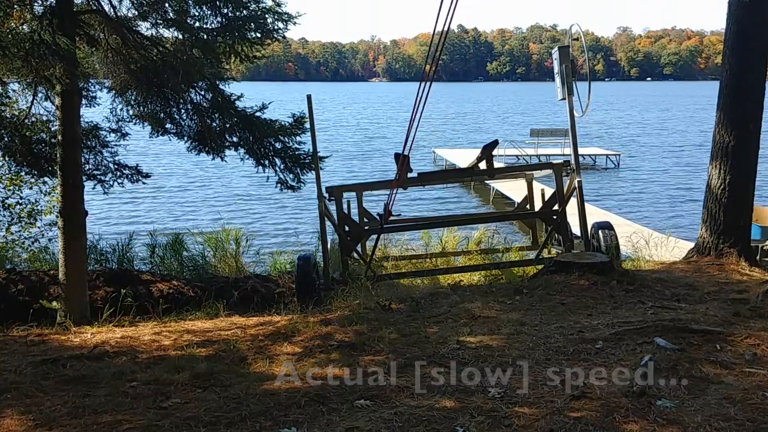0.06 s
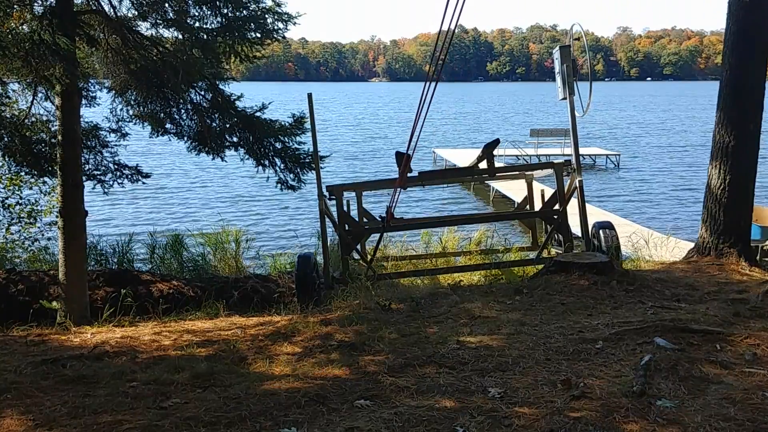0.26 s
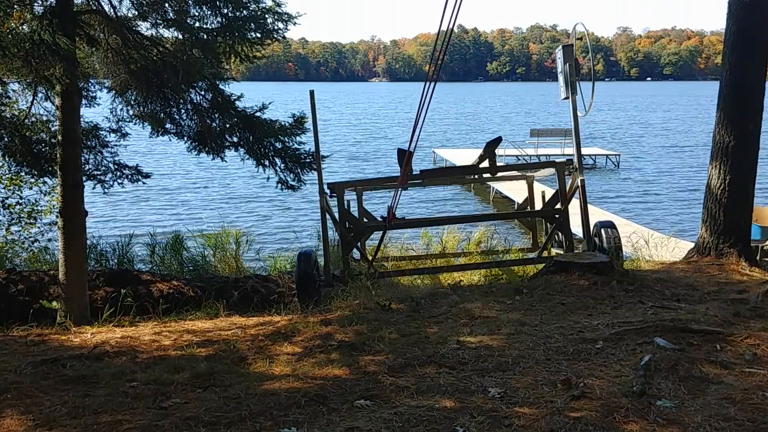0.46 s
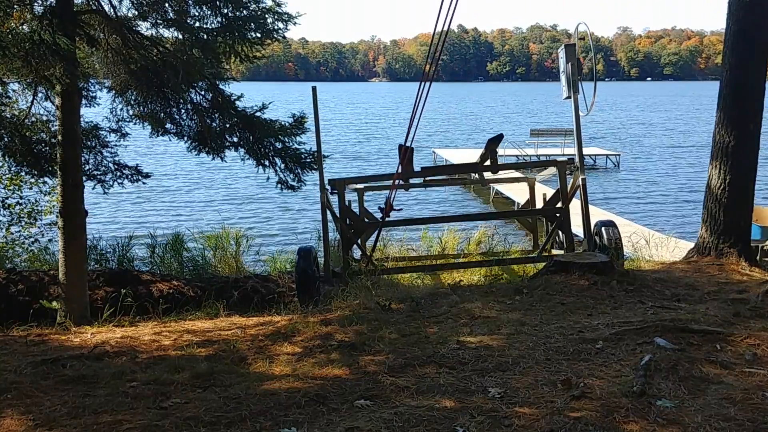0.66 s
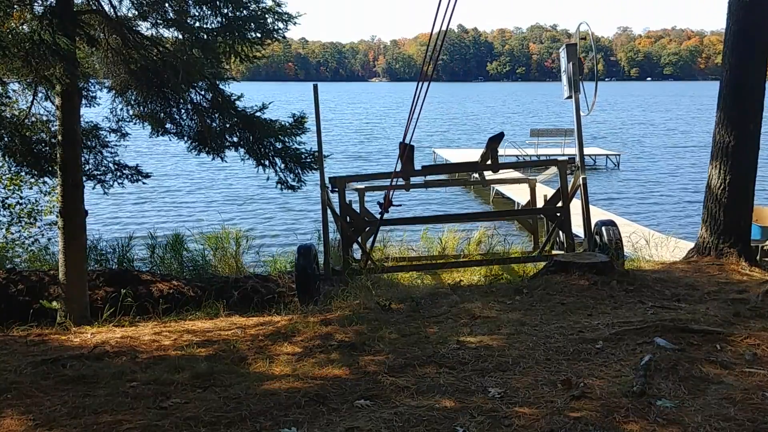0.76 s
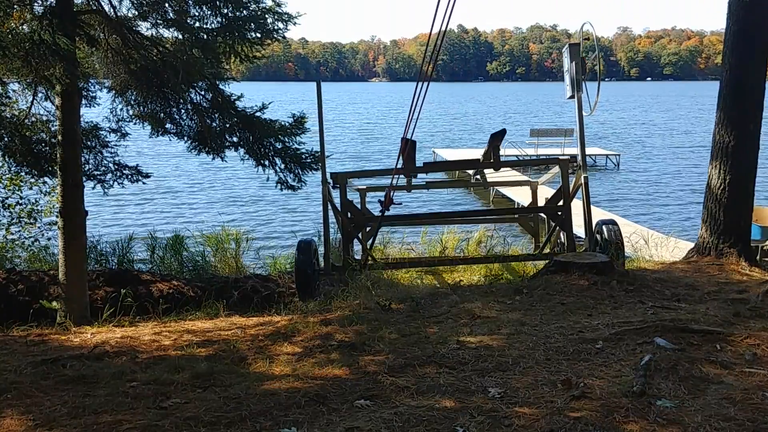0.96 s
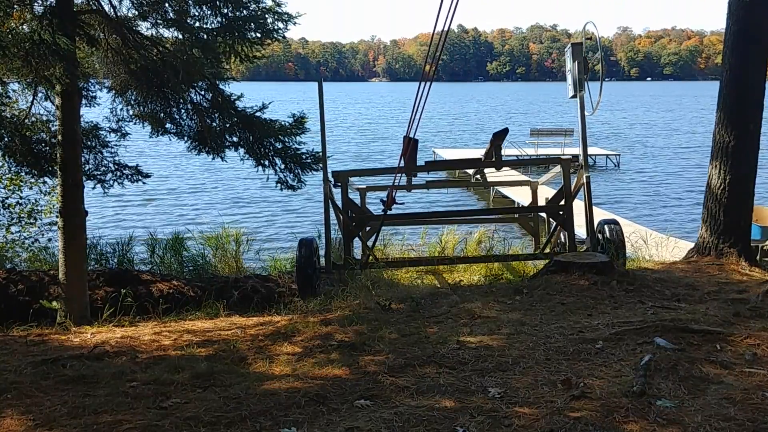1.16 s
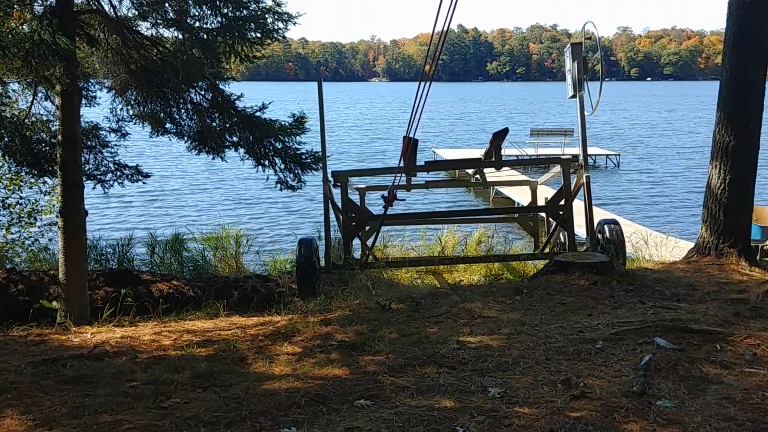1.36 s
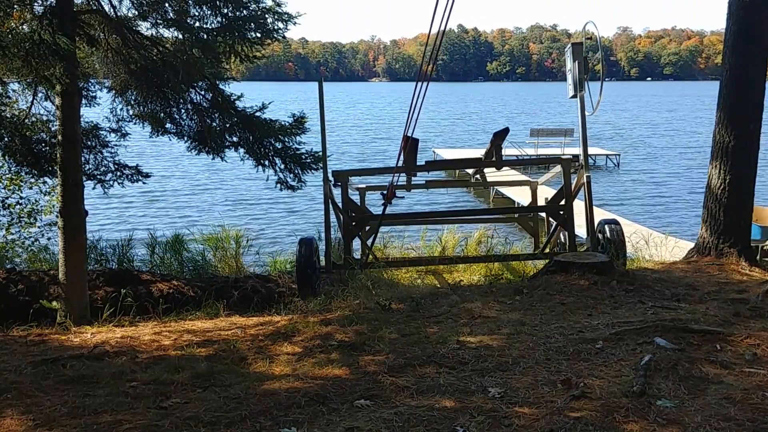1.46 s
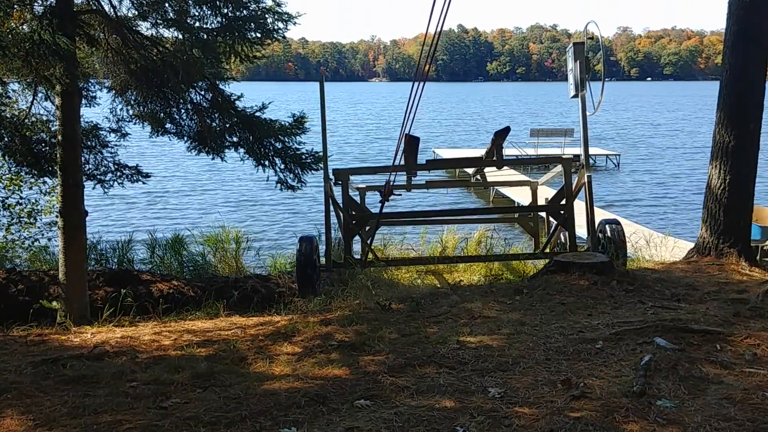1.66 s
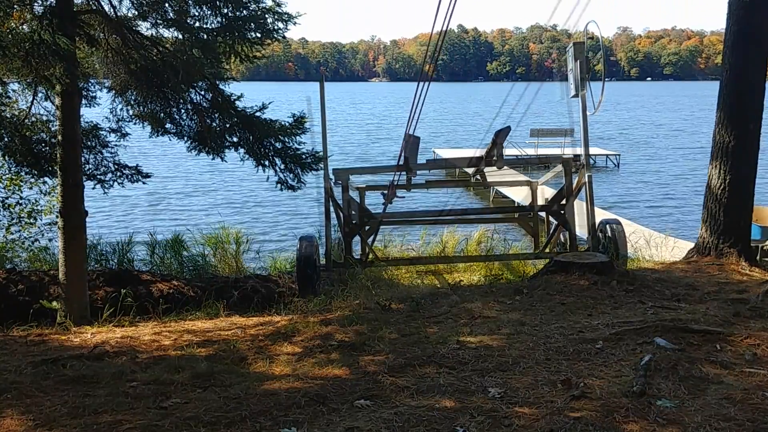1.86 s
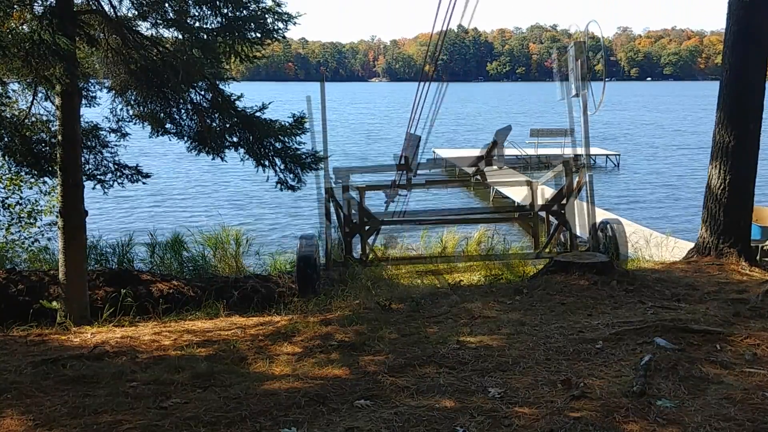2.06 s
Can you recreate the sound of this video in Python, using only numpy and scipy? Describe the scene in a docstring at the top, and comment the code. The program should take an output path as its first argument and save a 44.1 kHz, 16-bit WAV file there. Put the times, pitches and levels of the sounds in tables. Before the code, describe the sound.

High squeaks from pulleys slowly hauling a boat lift at a quiet lakeshore.

```python
"""A quiet lakeshore, with pulley blocks to the right of the microphone slowly hauling up a boat lift.
Low rumble and faint open-air hiss run throughout. The rope rustles, then dry sheaves squeak in short
stick-slip tones, scattered by the frame and the trees. The frame thuds softly among them, loudest
at 1.2 s, where it shifts with a scrunch. One more squeak follows, and three small ticks come last."""
import sys
import numpy as np
from scipy import signal
from scipy.fft import rfft, irfft
from scipy.io import wavfile

SR = 44100
rng = np.random.default_rng(int(sys.argv[2]) if len(sys.argv) > 2 else 0)


def unload_audio(sound):
    """Save the sound as a 16-bit wav file, at the path given as the first command line argument."""
    columns = np.transpose(np.atleast_2d(sound))
    # keep every value between -1 and 1, then stretch to whole-number steps
    steps = np.round(np.clip(columns, -1, 1) * 32767)
    wavfile.write(sys.argv[1], SR, steps.astype(np.int16))


N = 92610
T = np.arange(N) / SR
JITTER_HZ = 138.3   # how fast a rubbed tone's pitch wavers
# Friction noise of a dry sheave: frequency_hz, level_db
RASP_SPECTRUM = [(500, -22), (1400, -12.5), (2300, 9), (3200, 0), (4400, -1), (8500, 1.5), (11000, -11),
                 (14500, -7)]


def from_db(db):
    """Decibels to gain."""
    return 10 ** (np.asarray(db) / 20)


def unit_rms(x):
    """Scale to rms 1."""
    return x / np.sqrt(np.mean(x ** 2) + 1e-20)


def drift(rate_hz):
    """Smooth random wander, rms 1."""
    pole = np.exp(-2 * np.pi * rate_hz / SR)
    return unit_rms(signal.lfilter([1], [1, -2 * pole, pole * pole], rng.standard_normal(N)))


def noise(spectrum):
    """Noise of a given colour, rolled off beyond the spectrum's ends, rms 1."""
    hz, db = np.transpose(spectrum)
    f = np.maximum(np.fft.rfftfreq(N, 1 / SR), 1)
    colour = from_db(np.interp(np.log(f), np.log(hz), db))
    roll_off = np.minimum(f / hz[0], 1) ** 2 * np.minimum(hz[-1] / f, 1) ** 2
    return unit_rms(irfft(rfft(rng.standard_normal(N)) * colour * roll_off, N))


def wide_noise(spectrum, shared):
    """Stereo noise with a share of its power common to both sides."""
    common = np.sqrt(shared) * noise(spectrum)
    return common + np.sqrt(1 - shared) * np.array([noise(spectrum), noise(spectrum)])


def pan(db):
    """Left and right gains, db apart; negative is to the right."""
    return from_db(np.array([[db / 2], [-db / 2]]))


def arch(start, length):
    """A smooth swell and fade."""
    return np.sin(np.pi * np.clip((T - start) / length, 0, 1))


def swell(peak_s, rise_s, fall_s):
    """Exponential rise to a peak and fall from it."""
    return np.exp(-np.maximum((peak_s - T) / rise_s, (T - peak_s) / fall_s))


def snap(start, fall_s):
    """Instant onset and exponential fall."""
    return (T >= start) * np.exp(-np.abs(T - start) / fall_s)


def delayed(x, delay_s):
    """The same sound a little later."""
    return np.interp(T - delay_s, T, x, left=0)


def rumble():
    """A low rumble that swells and sinks, nearly the same on both sides."""
    # Colour of the rumble: frequency_hz, level_db
    spectrum = [(25, -42), (42, -28), (63, 5), (80, -6), (103, 3.5), (135, -7), (160, -11), (185, -7.5),
                (230, -44), (400, -46.5)]
    # Its rise and fall: time_s, level_db
    levels = [(0, -53.5), (.15, -50.5), (.3, -43.5), (.42, -47.5), (.48, -56), (.58, -51), (1.0, -55),
              (1.12, -44.5), (1.3, -52.5), (1.38, -45), (1.46, -56.5), (1.6, -51), (2.1, -51.5)]
    return from_db(np.interp(T, *np.transpose(levels))) * wide_noise(spectrum, shared=0.94)


def open_air():
    """Faint, wide hiss of the open shore."""
    # Colour of the hiss: frequency_hz, level_db
    spectrum = [(120, 2), (250, -2.5), (400, -8), (750, -11), (1100, -15.5), (1650, -18.5), (2400, -18),
                (4400, -25.5), (8000, -27.5), (10500, -28), (13000, -27.5), (15800, -31)]
    return from_db(-58) * wide_noise(spectrum, shared=0.19)


def rope_rustles():
    """The loaded rope shifts in short bursts that start abruptly and run out."""
    # Bands of rope noise: start_s, length_s, centre_hz, level_db, half_width_share
    bursts = [(0.106, 0.045, 2540, -61.5, 0.48), (0.231, 0.067, 1400, -59, 0.26),
              (0.236, 0.081, 505, -60, 0.18), (0.773, 0.05, 1900, -61.5, 0.18),
              (1.065, 0.02, 4300, -53.5, 0.16), (1.165, 0.011, 1310, -50, 0.16),
              (1.18, 0.029, 1350, -58, 0.17), (1.272, 0.032, 4200, -62, .22),
              (1.403, 0.044, 5800, -58, .45), (1.751, 0.031, 3200, -59.5, 0.17),
              (1.755, 0.036, 2010, -55, 0.11)]
    out, rise_s = np.zeros(N), 0.0035
    for start, length, hz, db, width in bursts:
        t = T - start
        band = signal.butter(2, [hz * (1 - width), hz * (1 + width)], "band", fs=SR, output="sos")
        envelope = np.clip(t / rise_s, 0, 1) * np.sqrt(np.clip(1 - t / length, 0, 1))
        out += from_db(db) * envelope * unit_rms(signal.sosfilt(band, rng.standard_normal(N)))
    return out


def sheave_squeaks():
    """Dry sheaves stick and slip in ragged tones; overtones fade first and a nearby mode beats along."""
    # Slips of a sheave: start_s, attack_s, hold_s, pitch_hz, glide_hz_per_s, level_db,
    # second_harmonic_db, third_harmonic_db, pitch_roughness_share, pan_db
    slips = [(.199, 0.0076, 0.024, 2206, -1400, -24, -3.5, -12.5, .017, -9),
             (.359, .02, 0.023, 2651, -500, -30, -3.5, -17.5, 0.0087, -7.5),
             (0.4623, 0.0045, 0.022, 2238, 2200, -28, -4, -11, 0.023, -8.5),
             (.498, 0.004, 0.046, 2694, -4, -42, -17, -15.5, 0.01586, -10),
             (0.699, 0.014, 0.011, 2690, -24.5, -51, -21, -41, .004, -9.5),
             (.722, 0.014, 0.0089, 2700, -600, -33.5, -18, -39, 0.0063, -8.5),
             (.754, 0.0073, 0.031, 2693, -15, -47, -18.5, -45, 0.01165, -9),
             (0.878, 0.017, 0.029, 2327, -5.5, -61, -18, -27, .012, -6.5),
             (1.044, .013, .022, 2675, -700, -36, -6, -20.5, 0.0098, -7),
             (1.326, 0.023, 0.027, 2664, 900.5, -28.5, -4, -11.5, 0.0054, -5.5)]
    # Higher harmonics: pitch_multiple, level_against_third_db
    upper_harmonics = [(4, -12.5), (5, -21), (6, -18), (7, -24)]
    ring_t60_s, overtone_t60_s, mode_t60_s = 0.057, 0.034, 0.064
    mode_below_hz, full_roughness = 64.9, 0.02
    out, rasp = np.zeros((2, N)), from_db(-30.5) * noise(RASP_SPECTRUM)
    for start, attack, hold, hz, glide, db, second_db, third_db, roughness, pan_db in slips:
        t = T - start
        ragged = np.sqrt(roughness / full_roughness)
        rise = np.clip(t / attack, 0, 1)
        since_slip = np.maximum(t - attack - hold, 0)
        ring = rise * from_db(-60 * since_slip / ring_t60_s)
        since_mid_hold = np.maximum(t - attack - 0.49 * hold, 0)
        overtones = rise ** 1.9 * from_db(-60 * since_mid_hold / overtone_t60_s)
        mode = np.clip(t / (attack + hold), 0, 1) ** 2 * from_db(-4 - 60 * since_slip / mode_t60_s)
        bend = 0.05 * ragged * np.exp(-np.abs(t) / 0.003)   # a rough squeak starts sharp and settles
        gliding_hz = hz + glide * np.clip(t, 0, attack + hold)
        pitch = gliding_hz * (1 + bend + roughness * drift(JITTER_HZ))
        phase = 2 * np.pi * np.cumsum(pitch) / SR
        partials = [(1, 0), (2, second_db), (3, third_db)]
        partials += [(k, third_db + offset_db) for k, offset_db in upper_harmonics]
        tone = ring * ragged * rasp + mode * np.sin(2 * np.pi * (hz - mode_below_hz) * t)
        for k, partial_db in partials:
            # the chatter of the slip widens every partial
            chatter = from_db(-12.5) * ragged * (drift(rate_hz=131) + 1j * drift(rate_hz=131))
            partial = np.imag((1 + chatter) * np.exp(1j * k * phase))
            tone += (ring if k == 1 else overtones) * from_db(partial_db) * partial
        out += pan(pan_db) * from_db(db) * tone
    return out


def sheave_bites():
    """A short bright rasp of metal as a sheave breaks loose."""
    # Moments of breaking loose: start_s, relative_level_db
    bites = [(0.2, -4), (0.4642, 1), (.504, -3.5)]
    envelope = sum(from_db(db - 46.5) * snap(start, fall_s=0.0075) for start, db in bites)
    return envelope * noise(RASP_SPECTRUM)


def lift_frame():
    """The frame moves over the ground with dull thuds and one scrunch, and sings faintly under load."""
    # Thuds of the frame: peak_s, pitch_hz, level_db
    bumps = [(0.346, 63, -38.5), (0.59, 87.4, -43), (1.203, 108.5, -28.5), (1.364, 112.5, -37),
             (1.608, 70, -41), (1.769, 59.2, -48.5)]
    # Colour of the scrunch: frequency_hz, level_db
    spectrum = [(60, -27), (130, -10), (290, 6.5), (450, -5.5), (900, -9.5), (1350, -29), (2000, -19.5),
                (5000, -33)]
    thuds = np.zeros(N)
    for peak_s, hz, db in bumps:
        envelope = from_db(db) * swell(peak_s, rise_s=0.02, fall_s=0.01)
        thuds += envelope * np.sin(2 * np.pi * hz * (T - peak_s))
    singing = from_db(-70.5) * arch(start=0.99, length=0.67) * np.sin(2 * np.pi * 1215 * T)
    scrunch = from_db(-48) * swell(peak_s=1.191, rise_s=0.043, fall_s=0.03) * noise(spectrum)
    return thuds + singing + scrunch


def metal_whistles():
    """Faint pure tones of lightly rubbed metal."""
    # Thin falling tones: start_s, length_s, pitch_hz, glide_hz_per_s, level_db
    tones = [(0.398, 0.05, 14440, -12000, -49), (1.384, 0.09, 13260, -900, -61.5)]
    out = np.zeros(N)
    for start, length, hz, glide, db in tones:
        pitch = (hz + glide * np.clip(T - start, 0, length)) * (1 + 0.0038 * drift(JITTER_HZ))
        out += from_db(db) * arch(start, length) * np.sin(2 * np.pi * np.cumsum(pitch) / SR)
    return out


def ticks():
    """Small bright ticks that die at once."""
    # Dry ticks: start_s, level_db
    onsets = [(2.07, -49), (2.084, -53), (2.095, -57)]
    # Their colour: frequency_hz, level_db
    spectrum = [(900, -8), (1900, 3.5), (4000, -6), (9000, -11.5), (12000, 3), (15500, -4.5)]
    return noise(spectrum) * sum(from_db(db) * snap(start, fall_s=0.0068) for start, db in onsets)


def reflected(x):
    """A sound with its first bounces off the ground and the frame."""
    # Close reflections: delay_s, level_db
    echoes = [(.0047, -14.5), (0.0122, -14)]
    return x + sum(from_db(db) * delayed(x, delay_s) for delay_s, db in echoes)


def scatter(x, t60_s, cut_hz):
    """Many small echoes that build up and die away, different on each side."""
    tail = rng.standard_normal((2, N)) * from_db(-60 * T / t60_s) * (1 - np.exp(-T / 0.0043))
    tail /= np.sqrt(np.sum(tail ** 2, axis=1, keepdims=True))
    dulled = signal.sosfilt(signal.butter(2, cut_hz, fs=SR, output="sos"), x)
    return signal.fftconvolve(dulled[None], tail, axes=1)[:, :N]


def scene():
    """The lift stands to the right, with echoes from close by and from the trees, over the shore's air."""
    blocks = sheave_squeaks() + pan(-8) * (sheave_bites() + metal_whistles() + rope_rustles())
    left, right = [reflected(side) for side in blocks]
    early = np.array([left, delayed(right, delay_s=5e-6)])
    mono = blocks.mean(axis=0)
    near = from_db(-10.5) * scatter(mono, t60_s=0.12, cut_hz=15000)
    trees = from_db(-9) * scatter(mono, t60_s=0.41, cut_hz=4320)
    low, air = rumble(), open_air()
    return early + pan(-4) * (air + near + trees + ticks()) + pan(-6) * (low + lift_frame())


def record(dry):
    """The microphone is dull in a narrow treble band, and the very top is cut steeply."""
    dip_hz, dip_db, cutoff_hz = 10770, -13, 15900
    band = signal.lfilter(*signal.iirpeak(dip_hz, Q=1.77, fs=SR), dry)
    dipped = dry + (from_db(dip_db) - 1) * band
    return signal.sosfilt(signal.ellip(12, 0.1, 70, cutoff_hz, fs=SR, output="sos"), dipped)


dry = scene()
out = record(dry)
unload_audio(out)
```